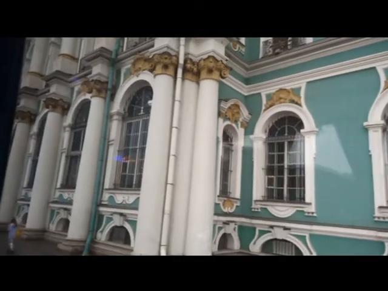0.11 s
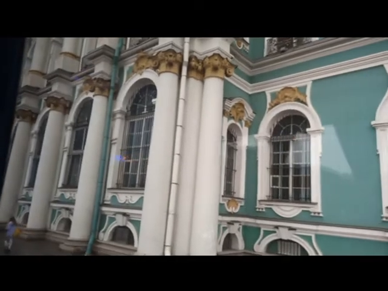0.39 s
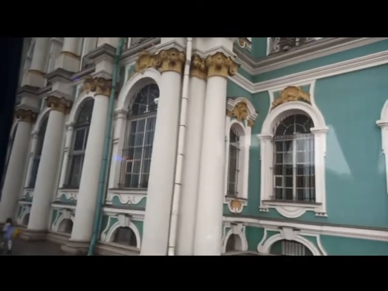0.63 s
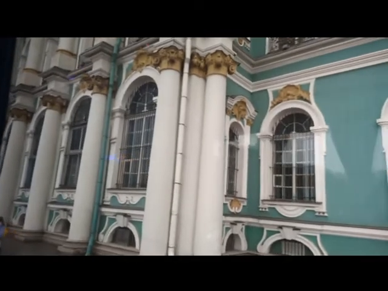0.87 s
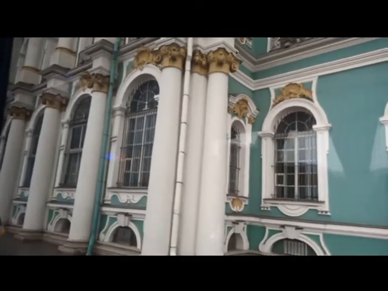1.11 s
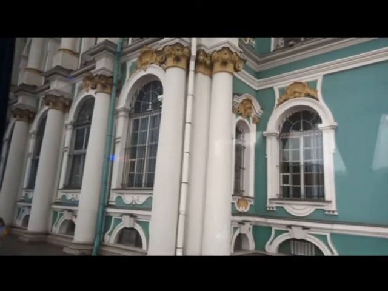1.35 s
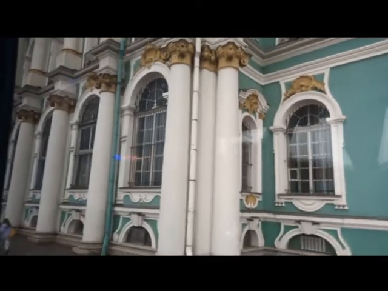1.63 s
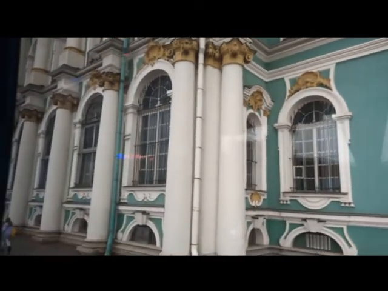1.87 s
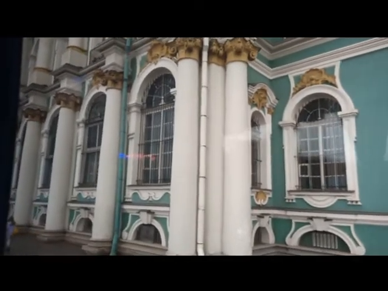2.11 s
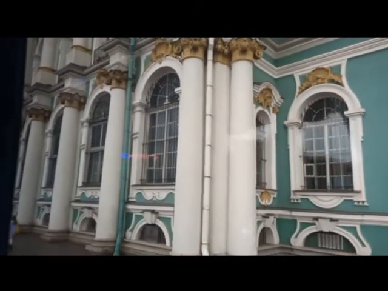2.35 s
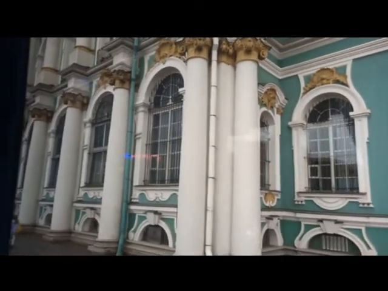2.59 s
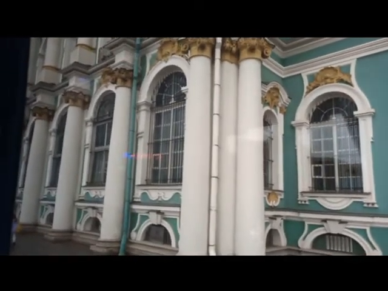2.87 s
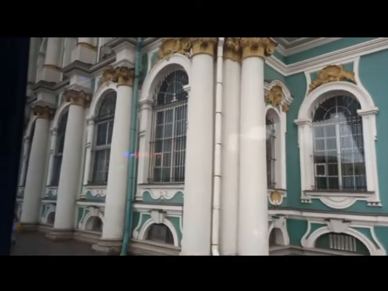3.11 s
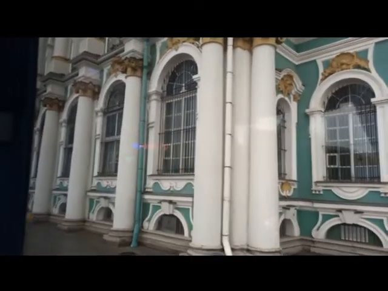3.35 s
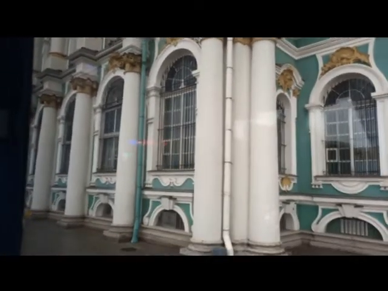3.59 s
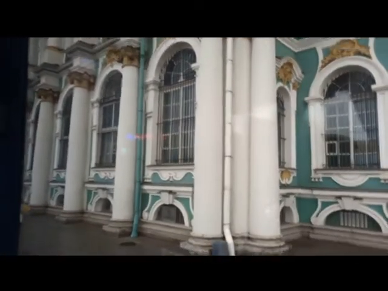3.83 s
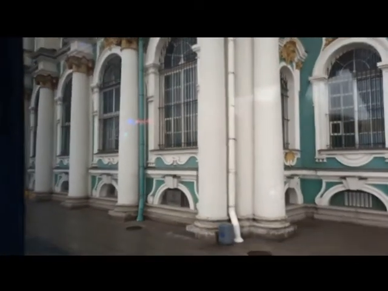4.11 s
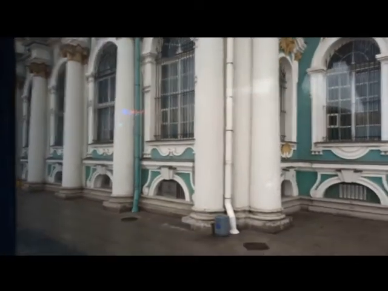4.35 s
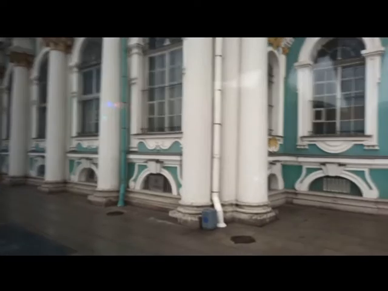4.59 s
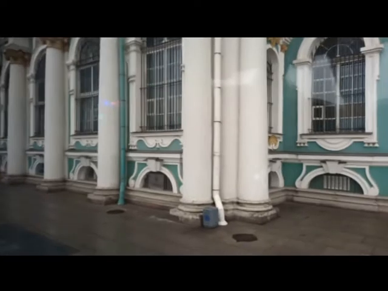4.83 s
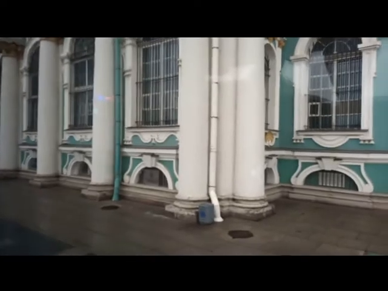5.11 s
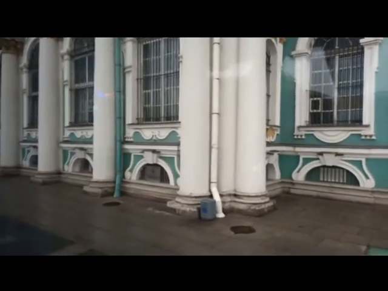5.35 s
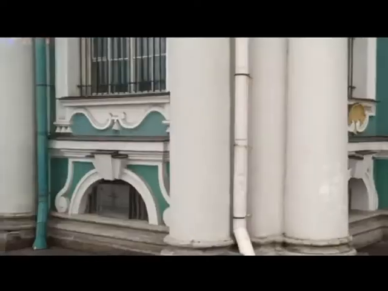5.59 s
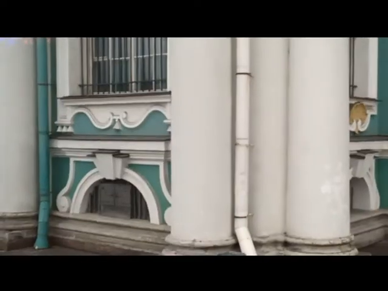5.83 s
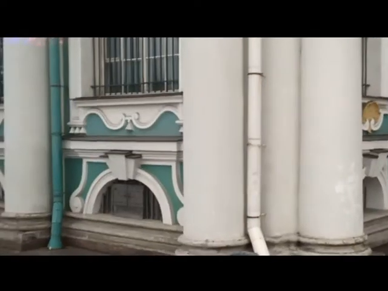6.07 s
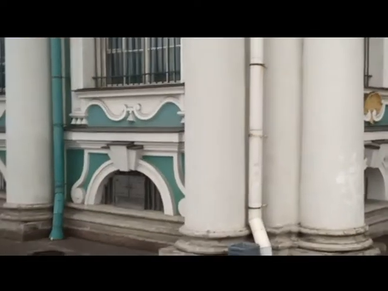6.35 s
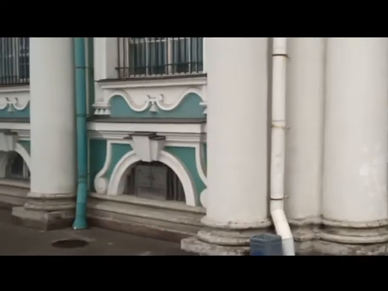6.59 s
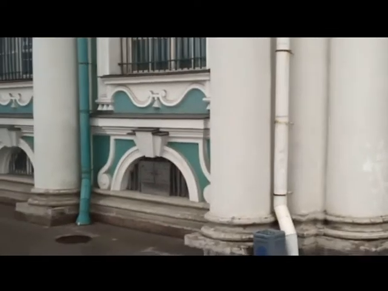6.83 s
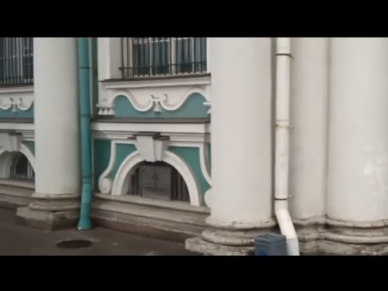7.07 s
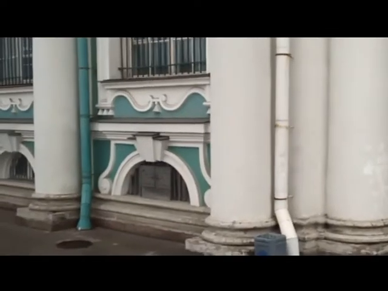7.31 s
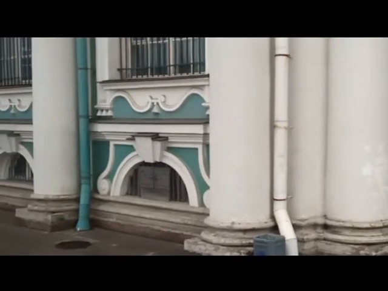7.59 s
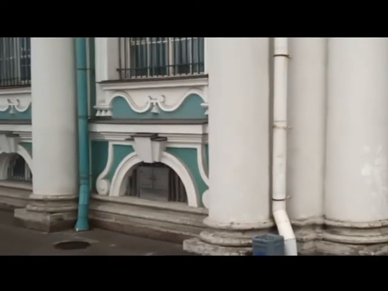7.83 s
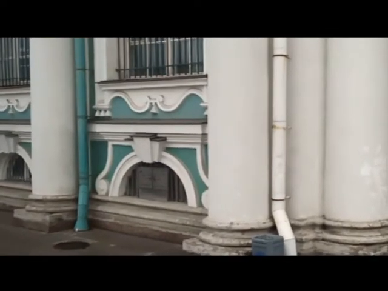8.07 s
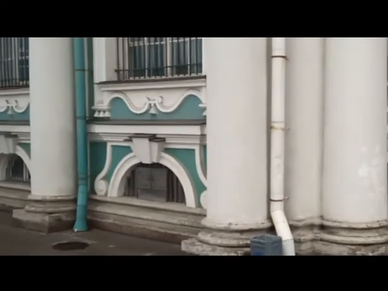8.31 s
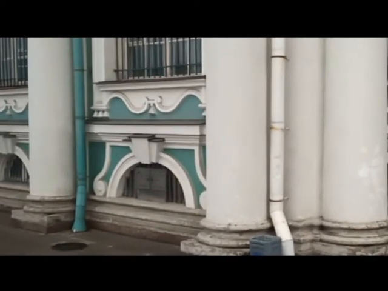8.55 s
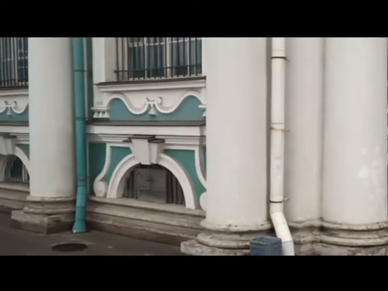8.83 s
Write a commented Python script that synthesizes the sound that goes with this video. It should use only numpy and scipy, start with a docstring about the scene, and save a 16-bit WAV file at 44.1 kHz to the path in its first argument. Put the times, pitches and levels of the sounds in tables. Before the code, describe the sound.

A steady low engine drone fills a bus cabin, with faint wavering whine, soft chatter of loose trim, dull knocks and tiny clicks.

```python
"""Inside the cabin of a bus whose six-cylinder diesel runs near idle.
Engine orders (sines on the crank angle) boom in the body over a broad rumble of coloured noise.
Panels hum, a fan whines through its resonant duct, and loose trim rattles in grains timed by the firing.
Fittings knock and tick as struck modes; a seat creaks once and cloth rustles, both as resonant noise.
The microphone falls steeply above about 7.5 kHz and adds a faint hiss of its own."""
import sys
import numpy as np
from scipy import signal
from scipy.fft import rfft, irfft, next_fast_len
from scipy.io import wavfile

SR = 44100
rng = np.random.default_rng(int(sys.argv[2]) if len(sys.argv) > 2 else 0)


def magnitude_from_level(level_db):
    """Linear magnitude for a level in decibels (20 dB per decade)."""
    exponent = np.asarray(level_db, float) / 20
    return 10 ** exponent


def wav_out(sig):
    """Save sig, one row per channel (or a flat mono array), as 16-bit PCM at SR to the path in sys.argv[1]."""
    wavfile.write(sys.argv[1], SR, np.round(np.clip(np.atleast_2d(sig).T, -1, 1) * 32767).astype(np.int16))


N = 394254
TIME_S = np.arange(N) / SR


def rms_one(x):
    """Scales a sound to rms 1."""
    return x / np.sqrt(np.mean(x ** 2) + 1e-20)


def in_time(rows):
    """Draws straight lines through timed rows: one curve for each column after the time."""
    s, *columns = np.transpose(rows)
    return [np.interp(TIME_S, s, column) for column in columns]


def drift(rate_hz):
    """Slow chance of spread 1: noise at SR / 40 through a double one-pole low-pass."""
    r = np.exp(-80 * np.pi * rate_hz / SR)
    noise = rng.standard_normal(N // 40 + 4002)
    slow = signal.lfilter([1], [1, -2 * r, r * r], noise)[4000:]      # drop the settling
    return np.interp(np.arange(N) / 40, np.arange(len(slow)), rms_one(slow - slow.mean()))


def bumps(rows, rise_s, fall_s):
    """Sum in dB of bell-shaped bumps, each with the same rise and fall."""
    return sum(rise_db * np.exp(-((TIME_S - s) / np.where(TIME_S < s, rise_s, fall_s)) ** 2)
               for s, rise_db in rows)


def ring(clicks, hz, t60_s):
    """A damped mode: a unit click sets a sine of starting height 1 ringing."""
    r = magnitude_from_level(-60 / (t60_s * SR))
    w = 2 * np.pi * hz / SR
    return signal.lfilter([0, np.sin(w)], [1, -2 * r * np.cos(w), r * r], clicks + 1e-18)


def resonance(x, hz, width_hz):
    """A band-pass resonance of unit peak gain."""
    r = np.exp(-np.pi * width_hz / SR)
    poles = [1, -2 * r * np.cos(2 * np.pi * hz / SR), r * r]
    return signal.lfilter([(1 - r * r) / 2, 0, (r * r - 1) / 2], poles, x)


def coloured_noise(spectrum, patchy_db, rate_hz, count):
    """Noise of the given colour in overlapping bands, each flickering on its own; rms 1."""
    size = next_fast_len(N)
    log_hz = np.log(np.arange(size // 2 + 1) * SR / size + 1)
    hz, level_db = np.transpose(spectrum)
    colour = rfft(rng.standard_normal(size)) * magnitude_from_level(np.interp(log_hz, np.log(hz), level_db))
    place = np.interp(log_hz, np.log([hz[0], hz[-1]]), [0, count - 1])
    out = np.zeros(N)
    for k in range(count):
        share = np.clip(1 - abs(place - k), 0, 1)
        out += irfft(colour * share, size)[:N] * magnitude_from_level(patchy_db * drift(rate_hz))
    return rms_one(out)


# Engine speed. Each row: time in seconds, firings per second.
SPEED = [(0, 35.5), (.8, 35.67), (2.0, 35.62), (3.4, 35.32), (4.8, 35.16), (6.0, 35.1), (8.94, 35.04)]


def crank_cycles():
    """Running count of engine cycles: two crank turns and six firings each."""
    return np.cumsum(in_time(SPEED)[0]) / 6 / SR


# Engine orders, then belt-driven parts geared off the crank.
# Each row: multiple of the two-turn cycle, level in dB rms before load and wander.
ORDERS = [(5, -74), (6, -51), (9, -57), (10, -61), (12, -50), (14, -56), (15, -45), (16, -51), (17, -54),
          (18, -52), (20, -54), (22, -54), (23, -57), (25, -57), (27, -56), (40, -62), (48, -63), (50, -64),
          (60, -61), (64, -59), (6.43, -57), (7.47, -61), (13.2, -50)]


def engine(cycles, load_db):
    """Each order is a sine on the crank angle; uneven firing makes its height and phase wander."""
    out = np.zeros(N)
    for order, level_db in ORDERS:
        unsteady = np.clip(order / 15, .2, 1)      # low orders are the steadiest
        phase = 2 * np.pi * (order * cycles + rng.random()) + 0.49 * unsteady * drift(2.8)
        height = magnitude_from_level(level_db + 3.1 * unsteady * drift(1.4)) * np.sqrt(2)
        out += height * np.sin(phase)
    return out * magnitude_from_level(0.1 * load_db)      # the orders follow a tenth of the boom's swing in dB


# Swells of the ride. Each row: time in seconds, boom level in dB, drone level in dB, both before the throb.
RIDE = [(0, -36.5, -50), (1.2, -37.5, -48), (1.45, -41.5, -48.5), (2.9, -41, -49), (3.15, -38.5, -45),
        (3.6, -43, -48.5), (3.95, -35, -45.5), (4.2, -40, -48), (6.0, -43, -48.5), (6.3, -40, -47.5),
        (7.4, -40, -47), (7.85, -39.5, -47.5), (8.2, -40, -48), (8.94, -41, -47.5)]


def ride():
    """The levels in dB of the body's boom and drone over time."""
    return in_time(RIDE)


def throb(cycles):
    """Level swing in dB, once a turn and once a cycle."""
    return 2.5 * np.cos(4 * np.pi * cycles) + 1.3 * np.cos(2 * np.pi * cycles)


# Colour of the low body boom. Each row: frequency in Hz, relative level in dB per Hz.
BOOM = [(12, -29.5), (27, -29), (36, -25), (58, -25), (68, -2), (90, -1), (125, -2.5), (160, -3.5),
        (180, -8), (200, -18.5), (240, -26.5), (320, -63), (500, -120)]


def boom(boom_db, throb_db):
    """The body's lowest rumble: coloured noise swelling with the ride and throbbing with the crank."""
    return magnitude_from_level(boom_db + throb_db) * coloured_noise(BOOM, patchy_db=0.0, rate_hz=17.0, count=8)


# Colour of the drone above it. Each row: frequency in Hz, relative level in dB per Hz.
DRONE = [(110, -31.5), (190, -8), (232, -5), (365, 0.5), (390, -5.5), (432, -11.5), (520, -27),
         (680, -56.5), (1140, -120)]


def drone(drone_db, throb_db):
    """The body's middle rumble: patchy coloured noise that throbs less than the boom."""
    return magnitude_from_level(drone_db + 0.77 * throb_db) * coloured_noise(DRONE, patchy_db=2.5, rate_hz=8.0, count=16)


# Colour of the hiss. Each row: frequency in Hz, relative level in dB per Hz.
HISS = [(280, -26.5), (480, -2), (701, -7), (1020, -9), (1180, -12.5), (1500, -10), (1640, -6),
        (1780, -11.5), (3420, -25), (5550, -22), (7480, -33), (9720, -63), (16500, -120)]


def hiss():
    """The top of the broad noise: coloured, flickering band by band, at a steady overall level."""
    return magnitude_from_level(-67) * coloured_noise(HISS, patchy_db=2.5, rate_hz=17.0, count=22)


# Body panels humming with the shake.
# Each row: frequency in Hz, width in Hz, level in dB rms before the flutter.
HUMS = [(590, 23, -75.5), (1027, 99, -74.5), (1360, 91, -76.5), (1944, 94, -84), (2303, 160, -84),
        (2644, 330, -85.5)]


def hums():
    """Each panel rings on noise, fluttering within bounds several times a second."""
    out = np.zeros(N)
    for hz, width_hz, level_db in HUMS:
        flutter_db = 5.0 * np.tanh(drift(6.5))
        out += magnitude_from_level(level_db + flutter_db) * rms_one(resonance(rng.standard_normal(N), hz, width_hz))
    return out


# Fan whine pitch before its small wander. Each row: time in seconds, frequency in Hz.
WHINE_HZ = [(0, 1560), (.35, 1565), (.55, 1582), (.75, 1600), (1.1, 1612), (1.6, 1616), (4, 1614),
            (8.94, 1612)]
# The fan's sound flares up for a moment. Each row: time in seconds, rise in dB over the usual level.
FLARES = [(.49, 8), (.93, 4), (1.69, 7), (2.0, 5.5), (3.24, 7), (4.0, 6.5), (5.23, 7.5), (5.65, 13.5),
          (6.33, 5), (6.83, 13), (8.16, 11.5), (8.92, 11)]
WHINE_DB, DUCT_DB = -77.5, -79.5      # rms before the swell
DUCT_WAVER_DB, DUCT_WAVER_HZ = 4.5, 8.7


def fan():
    """A thin wavering whine and the breathy resonance of its duct waver and flare together."""
    swell_db = DUCT_WAVER_DB * np.tanh(drift(DUCT_WAVER_HZ)) + bumps(FLARES, rise_s=.05, fall_s=.052)
    pitch_hz = in_time(WHINE_HZ)[0] + 1.5 * drift(3.6)
    tone = np.sqrt(2) * np.sin(2 * np.pi * np.cumsum(pitch_hz) / SR)
    whine = magnitude_from_level(WHINE_DB + .9 * swell_db) * tone
    air = resonance(resonance(rng.standard_normal(N), 1640, 110), 1640, 110)
    return whine + magnitude_from_level(DUCT_DB + swell_db) * rms_one(air)


# Modes of the loose trim. Each row: frequency in Hz, relative level in dB, t60 in seconds.
TRIM = [(5100, -7.5, 0.021), (5430, -4.5, 0.02), (5835, -3, 0.0091), (6330, -8.5, 0.024)]
# Bursts of harder rattling. Each row: time in seconds, rise in dB over the usual chatter.
BURSTS = [(2.4, 4), (3.17, 6.5), (3.65, 6), (4.46, 6), (6.41, 8.5), (6.8, 5.5), (7.23, 5.5), (7.62, 6.5),
          (8.08, 6), (8.79, 7.5)]
RATTLE_DB = -81      # rms before waver and bursts
RATTLE_WAVER_DB, RATTLE_WAVER_HZ = 2, 2.7


def trim(cycles):
    """Loose trim chatters in grains, bunched twice per firing and more on every other bunch."""
    shake = 1 + .5 * np.cos(2 * np.pi * 12 * cycles) + .3 * np.cos(2 * np.pi * 6 * cycles)
    out = np.zeros(N)
    for hz, level_db, t60_s in TRIM:
        touch = rng.random(N) < 500 * shake / SR      # about 500 grains a second
        grains = ring(touch * rng.standard_normal(N), hz, t60_s)
        out += magnitude_from_level(level_db + 1.9 * drift(6.5)) * grains
    waver_db = RATTLE_WAVER_DB * np.tanh(drift(RATTLE_WAVER_HZ))
    effort_db = waver_db + bumps(BURSTS, rise_s=.07, fall_s=.033)
    return magnitude_from_level(RATTLE_DB + effort_db) * rms_one(out)


SCUFF_DB, SCUFF_S = -13, .012      # the contact drags on: level under the first touch, time constant


def struck(events, modes, contact_cycles, spread_db):
    """Every blow is a scuffing contact, longer when soft, that cracks and rings all modes with new strengths."""
    out = np.zeros(N)
    age = np.arange(int(.15 * SR)) / SR
    for s, peak_db, hard_hz, crack_db in events:
        along = age * hard_hz / contact_cycles
        scuff = magnitude_from_level(SCUFF_DB) * np.exp(-age / SCUFF_S) / (1 + along)
        contact = rng.standard_normal(len(age)) * along * (np.exp(1 - along) + scuff)
        blow = magnitude_from_level(crack_db) * rms_one(contact)
        for hz, level_db, t60_s in modes:
            strength_db = level_db + spread_db * rng.standard_normal()
            blow = blow + magnitude_from_level(strength_db) * rms_one(ring(contact, hz, t60_s))
        blow = signal.lfilter(*signal.butter(2, min(hard_hz, 12000), fs=SR), blow)      # soft is duller
        i = int(s * SR)
        out[i:i + len(age)] += (magnitude_from_level(peak_db) * blow / abs(blow).max())[:N - i]
    return out


# Knocks on a panel. Each row: time in seconds, dry peak in dB, hardness in Hz,
# crack level in dB on the scale of the mode levels.
KNOCKS = [(.233, -45, 1000, 4.5), (6.244, -47, 880, 2), (6.259, -40, 740, 2), (6.3056, -43.5, 4530, 6),
          (6.3685, -34.5, 2800, 9), (7.7099, -47, 6050, 2), (8.355, -44.5, 900, -3)]
# Modes of the panel. Each row: frequency in Hz, level in dB before the chance spread, t60 in seconds.
PANEL = [(424, 15.5, 0.032), (700, 0, 0.019), (966, -0.5, 0.05), (1297, -2.5, 0.022), (1705, -9, 0.02),
         (2125, 0, 0.03), (2590, -3, 0.044), (3090, -3.5, 0.011), (3710, -18, .012), (5200, -16, .01)]


def knocks():
    """Blows on a panel: short contacts ring its modes."""
    return struck(KNOCKS, PANEL, contact_cycles=2.07, spread_db=4.7)


# Ticks of a small latch. Each row: time in seconds, dry peak in dB, hardness in Hz,
# crack level in dB on the scale of the mode levels.
TICKS = [(3.1318, -68, 7040, 0), (6.5535, -60.5, 4500, 9), (6.9815, -53.5, 4200, -13),
         (7.0229, -54, 4500, -10), (7.0414, -47.5, 5460, 6), (7.163, -59, 5000, -6),
         (7.7125, -59, 4500, -8), (8.8687, -64, 4500, -10)]
# Modes of the latch. Each row: frequency in Hz, level in dB before the chance spread, t60 in seconds.
LATCH = [(2120, -5.5, 0.016), (3190, -8, 0.028), (3710, 3, 0.039), (4030, -3.5, 0.016), (4160, -9, 0.022),
         (4500, -1.5, 0.025), (5100, -4, 0.016)]


def ticks():
    """A small latch clicks: contacts of more cycles ring its higher modes."""
    return struck(TICKS, LATCH, contact_cycles=5.6, spread_db=2.5)


def rustles(events, bands, grain_db):
    """Short rubs: noise in the object's resonances, sliding in pitch, quick to rise and slower to fade."""
    out = np.zeros(N)
    rub = rng.standard_normal((len(bands), 2, N)) * magnitude_from_level(grain_db * drift(25))
    middle = np.mean([np.log2(band[0]) for band in bands])
    for start, length, level_db, glide, tilt_db in events:
        i, j = int(start * SR), int((start + length) * SR)
        along, stroke = np.linspace(0, 1, j - i), 0
        for (hz, width_hz, band_db), noise in zip(bands, rub):
            phase = 2 * np.pi * np.cumsum(hz * 2 ** (glide * along)) / SR
            # two slow noises on a cosine and a sine make a band around the gliding pitch
            a, b = signal.lfilter(*signal.butter(2, width_hz / 2, fs=SR), noise[:, i:j])
            band = rms_one(a * np.cos(phase) + b * np.sin(phase))
            stroke = stroke + magnitude_from_level(band_db + tilt_db * (np.log2(hz) - middle)) * band
        out[i:j] += magnitude_from_level(level_db) * np.sin(np.pi * along ** 0.61) * rms_one(stroke)
    return out


# A seat creaks. Each row: start in seconds, length in seconds, level in dB before the swell and fade,
# glide in octaves, tilt in dB per octave.
CREAKS = [(1.155, 0.2, -57.5, -0.1, -2)]
# Resonances of the seat. Each row: frequency in Hz, width in Hz, level in dB before the tilt.
SEAT = [(1390, 80, -13), (1540, 60, -1.5), (1670, 67, -7), (3450, 150, -20.5), (4600, 250, -24)]


def seat():
    """The seat's narrow resonances, rubbed without added grain, slide as it creaks."""
    return rustles(CREAKS, SEAT, grain_db=0.0)


# Cloth rustles. Each row: start in seconds, length in seconds, level in dB before the swell and fade,
# glide in octaves, tilt in dB per octave.
STROKES = [(1.9, 0.27, -72.5, 0.0087, -10), (2.44, 0.42, -74, .08, 12), (2.56, 0.08, -62.5, -0.048, 11),
           (2.69, .16, -69.5, 0, -1), (5.15, 0.3, -74, -0.012, -2.5)]
# Resonances of the cloth. Each row: frequency in Hz, width in Hz, level in dB before the tilt.
CLOTH = [(2315, 67, -2.5), (3390, 1800, -5.5), (4000, 170, -8.5), (5250, 250, -2), (6470, 550, -7.5)]


def cloth():
    """Grainy strokes of noise in the cloth's higher resonances."""
    return rustles(STROKES, CLOTH, grain_db=1.0)


CABIN_T60_S, CABIN_DB = 0.051, -2


def cabin(x):
    """Seats and glass scatter each small sound into a short, dense tail."""
    age = np.arange(int(.2 * SR)) / SR
    tail = rng.standard_normal(len(age)) * magnitude_from_level(-60 * age / CABIN_T60_S) * (age > .003)
    tail = tail / np.sqrt(np.sum(tail ** 2))
    return x + magnitude_from_level(CABIN_DB) * signal.fftconvolve(x, tail)[:N]


def scene():
    """Mixes the bus: engine and body, then fan and trim, then the small sounds."""
    cycles = crank_cycles()
    boom_db, drone_db = ride()
    load_db = boom_db - boom_db.mean()
    throb_db = throb(cycles)
    body = boom(boom_db, throb_db) + drone(drone_db, throb_db) + hiss() + hums()
    blows = cabin(knocks() + ticks())
    rubs = seat() + cloth()
    return (engine(cycles, load_db) + body + fan() + trim(cycles) + blows + rubs)[None]


def top_cut(x):
    """Nothing passes above the cut-off."""
    return signal.sosfilt(signal.butter(12, 15750, fs=SR, output="sos"), x)


MIC_CUT_HZ, SELF_NOISE_DB = 7550, -91


def record(dry):
    """The microphone path falls steeply in the treble; a faint flat self-noise lies under it."""
    dull = signal.sosfilt(signal.butter(8, MIC_CUT_HZ, fs=SR, output="sos"), dry)
    noisy = dull + magnitude_from_level(SELF_NOISE_DB) * rng.standard_normal(dry.shape)
    return top_cut(noisy)


dry = scene()
out = record(dry)
wav_out(out)
```